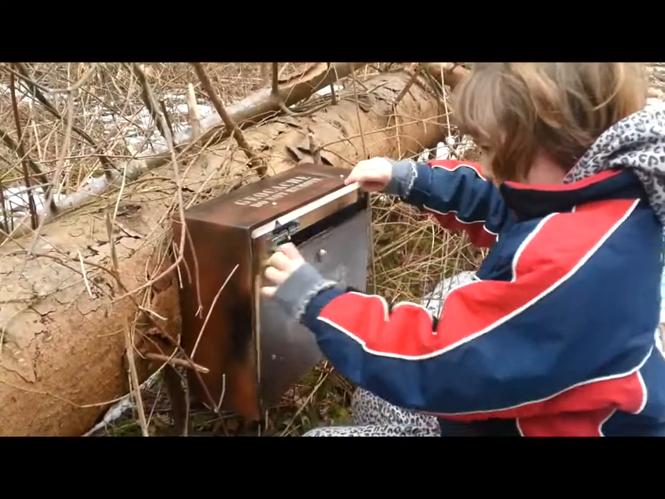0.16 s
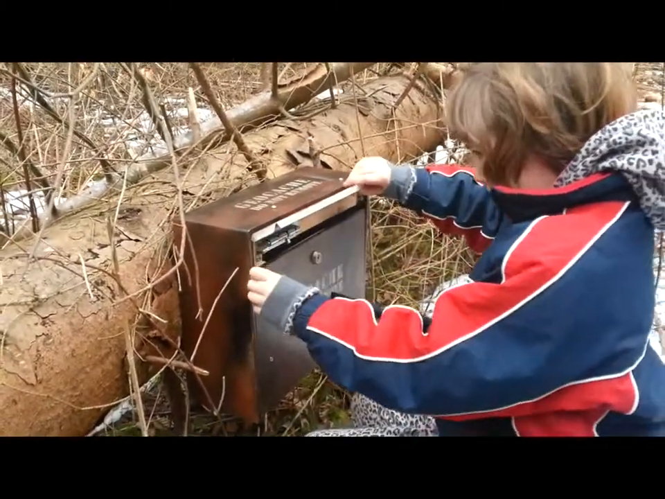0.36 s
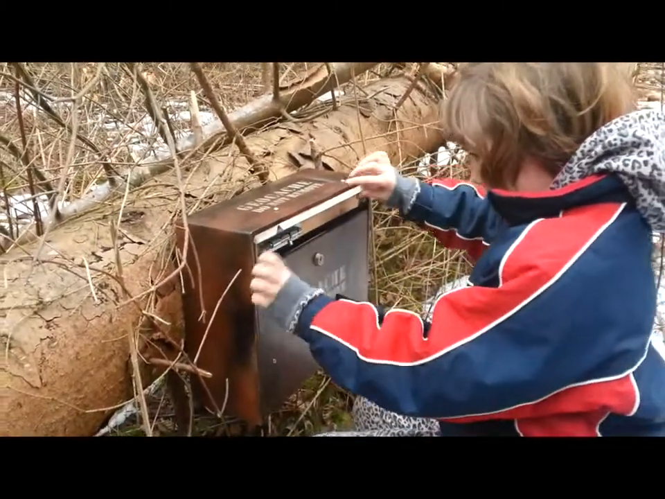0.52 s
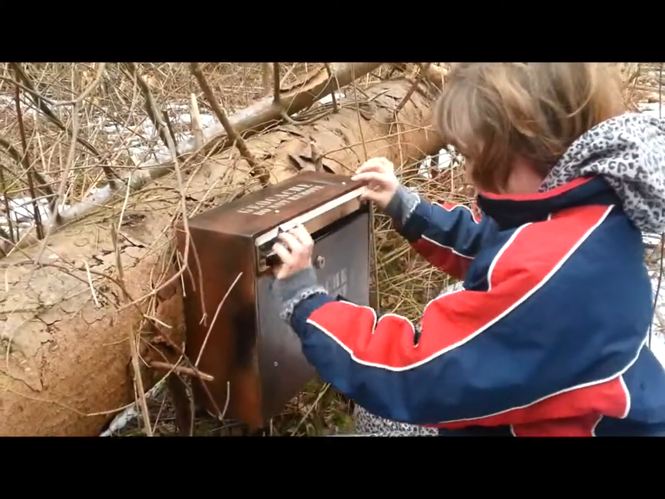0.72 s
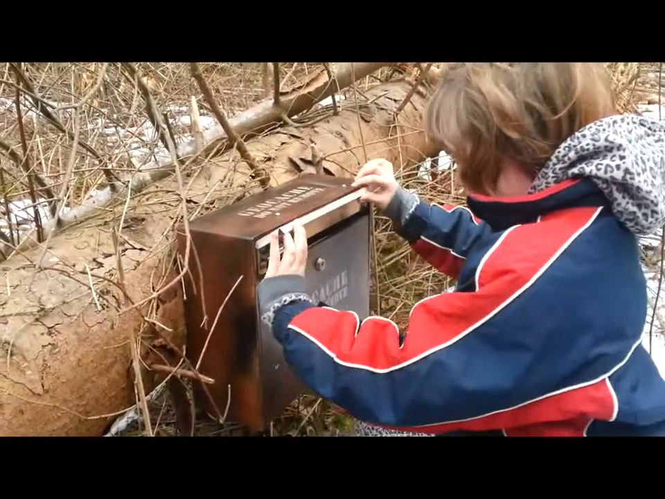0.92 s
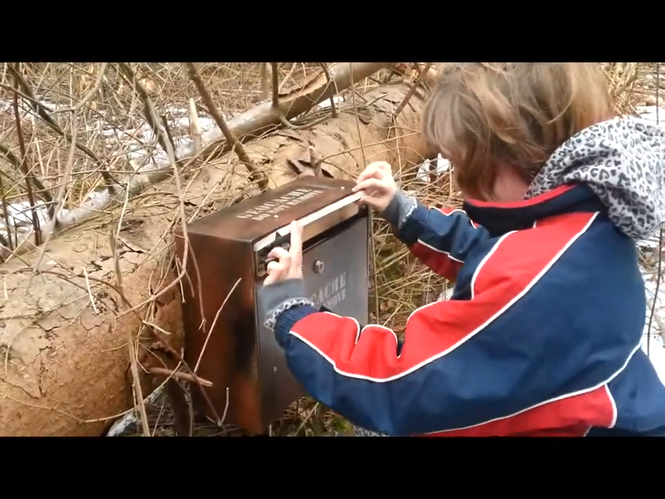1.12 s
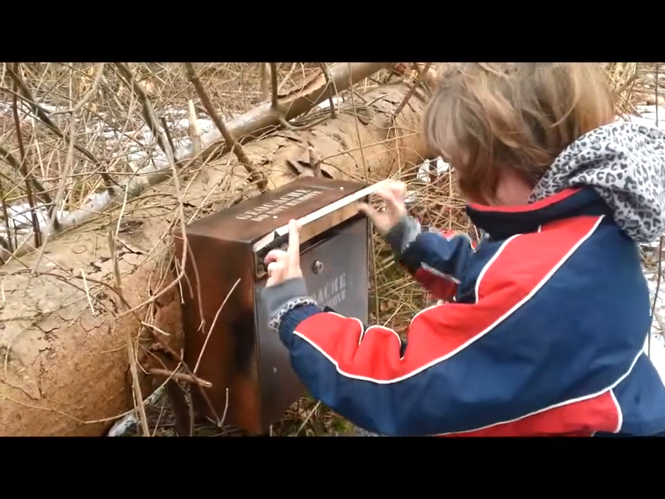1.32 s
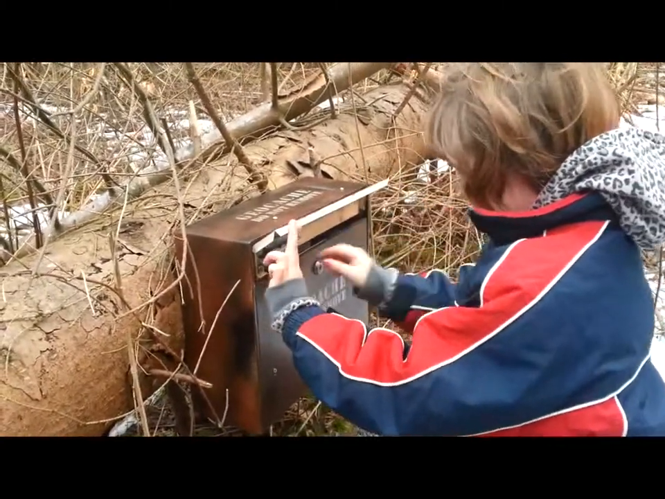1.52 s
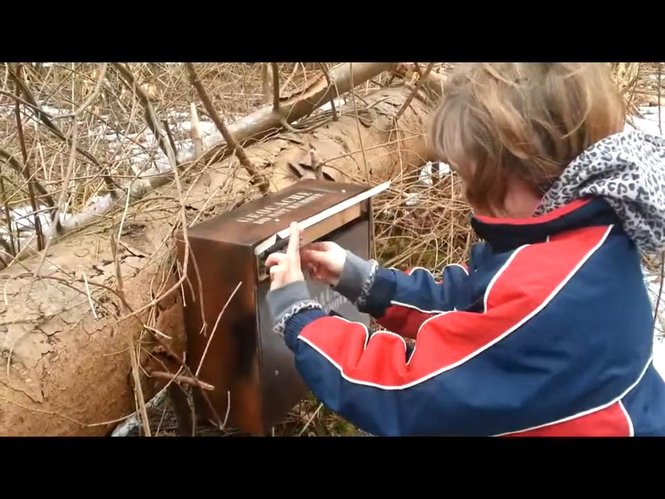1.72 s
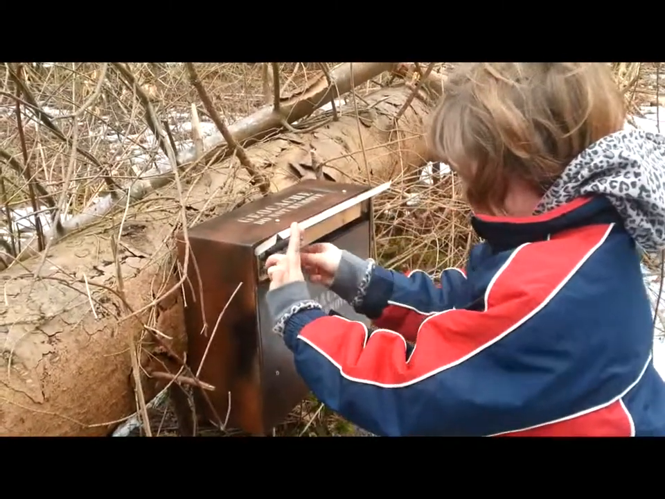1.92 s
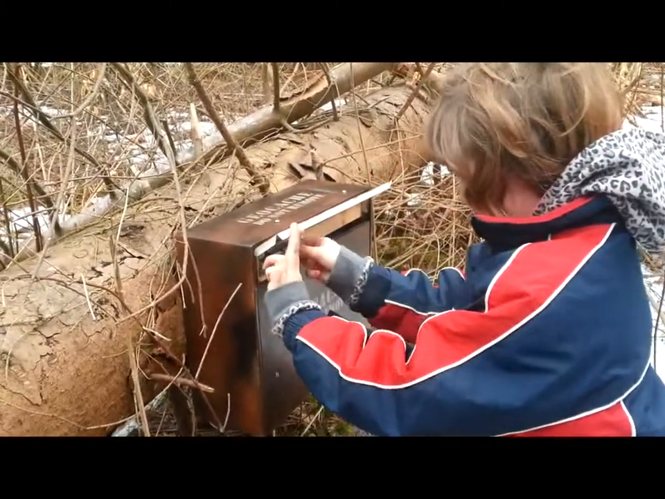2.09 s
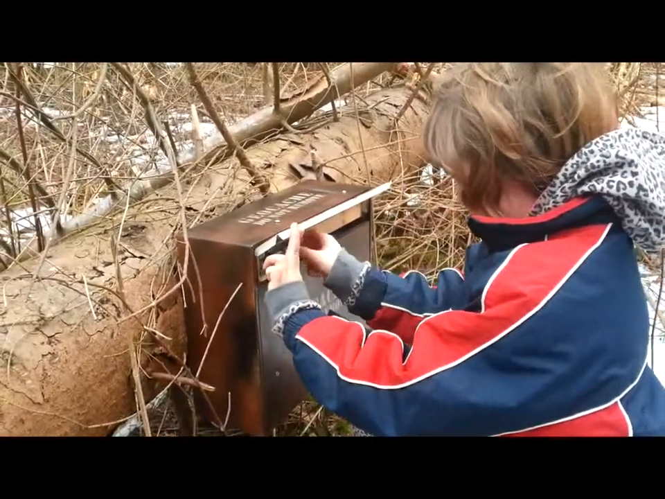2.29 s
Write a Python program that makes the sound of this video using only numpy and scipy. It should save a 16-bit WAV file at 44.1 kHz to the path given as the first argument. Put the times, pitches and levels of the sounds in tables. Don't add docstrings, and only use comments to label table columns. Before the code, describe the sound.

A metal letterbox door scrapes from about 0.1 seconds and slams near 0.27, bouncing quickly with a boxy, hollow ring that fades within half a second. Soft fingertip knocks and brushing follow at 0.7 to 1.1, then near quiet with faint touches around 1.5 to 1.6. At 2.0 the lock snaps brightly and rattles until 2.2. Close outdoor pickup, right-leaning, with low distant traffic, hum and hiss.

```python
import sys
import numpy as np
from scipy import signal
from scipy.fft import rfft, irfft, next_fast_len
from scipy.io import wavfile

SR = 44100
rng = np.random.default_rng(int(sys.argv[2]) if len(sys.argv) > 2 else 0)


def store_pcm(level_fs):
    pcm = np.round(np.clip(level_fs, -1, 1) * 32767).astype(np.int16)
    wavfile.write(sys.argv[1], SR, np.atleast_2d(pcm).T)


def nominal_scale(level):
    x = np.asarray(level, float) / 20
    return 10 ** x


N = 103635


def rms_one(x):
    return x / np.sqrt(np.mean(x ** 2) + 1e-20)


def at_hz(points, hz):
    curve_hz, value = np.transpose(points)
    return np.interp(np.log(hz), np.log(curve_hz), value)


def band(x, low_hz, high_hz, order=2):
    return signal.sosfilt(signal.butter(order, [low_hz, high_hz], "band", fs=SR, output="sos"), x)


def high_pass(x, hz, order):
    return signal.sosfilt(signal.butter(order, hz, "high", fs=SR, output="sos"), x)


def cut_top(x, hz):
    return signal.sosfilt(signal.ellip(12, .5, 70, hz, fs=SR, output="sos"), x)


def drift(rate_hz):
    r = np.exp(-80 * np.pi * rate_hz / SR)
    slow = signal.lfilter([1], [1, -2 * r, r * r], rng.standard_normal(N // 40 + 2002))[2000:]
    return np.interp(np.arange(N) / 40, np.arange(len(slow)), rms_one(slow))


def ring(clicks, hz, t60_s):
    r = nominal_scale(-60 / (max(t60_s, .005) * SR))
    w = 2 * np.pi * hz / SR
    return signal.lfilter([0, np.sin(w)], [1, -2 * r * np.cos(w), r * r], clicks + 1e-18)


def chatter(per_s):
    spread_db = 3.2
    sizes = nominal_scale(spread_db * np.minimum(rng.exponential(1, N), 4)) * rng.choice([-1, 1], N)
    return rms_one(sizes * (rng.random(N) < per_s / SR))


def touches(rows, clicks):
    strike, release_s, touch_db = 15.4, 0.0035, -21
    t = np.arange(N) / SR
    out = np.zeros((3, N))
    for start_s, level_db, boom_db, top_db, length_s in rows:
        fade = np.exp(-np.maximum(t - start_s - length_s, 0) / release_s)
        shape = clicks * (t >= start_s) * fade
        shape[int(start_s * SR)] = strike
        out += shape * nominal_scale(level_db + touch_db + np.array([[boom_db], [0], [top_db]]))
    return out


def door_force(clicks):
    # start_s, force_db, brightness_db
    scrape = [
        (0.099, -52.5, 6),
        (0.159, -38, -6),
        (0.194, -29.5, -8.5),
        (.25, -29.5, -3.5),
        (0.258, -26, 3.5),
        (0.274, -21.5, 2),
        (0.284, -24, 1),
        (0.293, -40, -9),
    ]
    # start_s, level_db, boom_db, top_end_db, chatter_length_s
    bounces = [(0.1876, -38, 6.5, 8.5, 0.012), (0.2554, -19, -4, -6, 0.0037),
               (0.2645, -21.5, 11, -7, 0.0015), (0.2690, -17.5, -8, 7, 0.012),
               (.2815, -13.5, 0, -11, 0.0044), (0.2887, -17, -1.5, -15, 0.014),
               (.2990, -27, -2, 6.5, 0.0046), (0.3058, -23, 0, -4, 0.0099), (0.3145, -27.5, 4.5, 0, 0.012),
               (0.3295, -32.5, 1.5, 1, 0.005), (.3375, -35.5, 10, 2, 0.0088), (0.35, -34.5, 6, -2, 0.013),
               (0.3677, -43, 11, -1, 0.01), (.393, -46.5, 4.5, 0, 0.0094), (0.4084, -44, 5, 2, 0.016)]
    slam_db = -14.5
    t = np.arange(N) / SR
    s, force_db, bright_db = np.transpose(scrape)
    low_db = np.interp(t, s, force_db, left=-99, right=-99) + slam_db
    rub = nominal_scale(low_db + np.interp(t, s, bright_db) * [[0], [1], [1]]) * clicks
    return rub + touches(bounces, clicks)


def finger_force(clicks):
    # start_s, level_db, boom_db, top_end_db, chatter_length_s
    knocks = [(0.6958, -37.5, -8, 0, 0.015), (0.7165, -33, 4.5, 0, 0.0031), (.7225, -34, 5.5, 0, 0.0043),
              (0.7379, -35, 6, 0, 0.014), (0.758, -38, -4, 0, 0.01), (.7765, -35.5, 4.5, 0.34, 0.0036),
              (.817, -39.5, -3, 0.24, 0.0064), (0.8338, -34, 3, 2.4, 0.0046),
              (0.8425, -30.5, -2, 1.1, 0.017), (.8595, -42, 6, 0.36, 0.009), (0.8715, -36, 1, 0.17, 0.0063),
              (.8795, -43, 3.5, 0, 0.0052), (0.9154, -38.5, -23, 0, 0.0034), (0.9827, -43, -11, 0, 0.004),
              (1.0498, -42, -21, 0.24, 0.012), (1.063, -34, -3, 3, 0.01), (1.0844, -48.5, 2, 0.28, 0.015),
              (1.503, -51, 5, 0, 0.028), (1.6003, -42.5, 0.5, 0.17, 0.028), (1.629, -45, -13, 0, 0.022)]
    # time_s, level_db
    fumble = [
        (0, -58),
        (.55, -62.5),
        (.95, -52.5),
        (1.15, -65),
        (1.4, -95),
        (1.6, -54),
        (1.75, -67),
        (2.2, -53),
        (2.35, -76),
    ]
    fumble_db, boom_db = -21, 8
    level_db = np.interp(np.arange(N) / SR, *np.transpose(fumble)) + fumble_db + 3 * drift(24.0)
    brushing = nominal_scale(np.array([level_db + boom_db, level_db, level_db])) * chatter(260)
    return touches(knocks, clicks) + brushing


def lock_force(clicks):
    # start_s, level_db, boom_db, top_end_db, chatter_length_s
    snaps = [(1.980, -33, -18, -6, 0.0056), (1.9898, -17, -12.5, 2, 0.0024),
             (1.9973, -18.5, -11, 2, 0.0043), (2.0035, -23, -1, 12, 0.0062),
             (2.0152, -16.5, -14.5, 2.5, 0.0029), (2.0235, -25.5, -9.5, 0, 0.005),
             (2.0362, -25.5, -10, 4, 0.016), (2.0493, -29, 3, -2, 0.004), (2.0666, -19, -9, -1.5, 0.0052),
             (2.0712, -31, -7, 0, 0.0021), (2.0810, -25.5, -9.5, 0, 0.006), (2.0926, -22, -10, -1, 0.0046),
             (2.1003, -29.5, -2, 5, 0.0068), (2.1065, -27, -7.5, -3, 0.0087),
             (2.1174, -28.5, -3, -6, 0.015), (2.136, -32, -4, -9, 0.0031),
             (2.149, -32.5, -6.5, -12, 0.0065), (2.164, -37.5, -5.5, -2, 0.0092),
             (2.1852, -41, 1, -12, 0.0041), (2.2094, -43.5, 2, -11, 0.013), (2.2514, -46, -2, -3, 0.0071),
             (2.3186, -42, -21, -10, 0.007)]
    return touches(snaps, clicks)


def letterbox(force, part, feel, start_s, end_s):
    # pitch_hz, level_db, t60_s
    panels = [(150, -10.5, 0.74), (207.8, -0.5, 0.43), (228.2, -0.5, 0.41), (294.7, -7.5, 0.51),
              (374.7, 2, 0.35), (436, -4.5, 0.54), (500.6, 2, 0.26), (553, -8, 0.35), (653, -18, 0.069),
              (742, -5.5, 0.063), (814, -8, 0.12), (930, -12.5, 0.14), (976, -12.5, 0.09),
              (1074, -7.5, 0.11)]
    # pitch_hz, level_db
    sheet_level = [(250, 2.5), (600, 0.5), (820, 5.5), (1400, -9), (2500, -10), (4000, -6.5), (6000, -22),
                   (10000, -28)]
    # pitch_hz, t60_s
    sheet_decay = [(120, 0.17), (500, 0.14), (1000, 0.11), (1500, 0.14), (4000, 0.05), (10000, 0.066)]
    panels_db, part_db, sheet_db, crack_db = -3, -9.5, -4, -6
    luck_db = 4.0
    deep_db, top_db, panel_damping, edge_damping, small_db = feel
    i, j = int(start_s * SR), int(end_s * SR)

    modes = [(hz, db + panels_db, t60) for hz, db, t60 in panels]
    modes += [(hz, db + part_db, t60) for hz, db, t60 in part]
    for hz in np.linspace(12, 99, num=80) ** 2 * rng.uniform(.98, 1.02, 80):
        level_db = sheet_db + small_db * (hz < 1250) + at_hz(sheet_level, hz)
        modes.append((hz, level_db, at_hz(sheet_decay, hz)))

    luck = nominal_scale(luck_db * rng.standard_normal((2, 2 * N)) - 2.0)
    luck = luck * rng.choice([-1, 1], (2, 2 * N))
    out = np.zeros((2, N))
    for k, (hz, db, t60_s) in enumerate(modes):
        db = db + deep_db * (hz < 440) + top_db * (hz > 4500)
        row = int(hz > 1250) + int(hz > 4500)
        damping = edge_damping if hz > 1250 else panel_damping
        shift = 900 * k
        struck = force[row, i:j] * luck[:, shift + i:shift + j]
        out[:, i:j] += nominal_scale(db) * ring(struck, hz, t60_s * damping)
    crack = nominal_scale(crack_db + top_db) * band(force[2], 2000, 8800)
    return high_pass(out / 10 + crack, 121, 4)


def ports(shared, loose):
    # pitch_hz, level_db
    port_level = [(60, -6.5), (140, 0), (330, -3.5), (780, -6.5), (1840, -9.5), (4330, -12), (10200, -8)]
    # pitch_hz, phase_rad
    port_phase = [(60, 0), (430, -1.0), (1120, -1.6), (2300, -2.8), (2900, -.4), (3300, 0)]
    # pitch_hz, share
    port_loose = [(100, .05), (500, .12), (1500, .55), (2800, .5), (4500, .1), (10000, .04)]
    size = next_fast_len(N + 4096)
    hz = np.maximum(np.arange(size // 2 + 1) * SR / size, 10)
    half = nominal_scale(at_hz(port_level, hz) / 2)
    apart = np.clip(at_hz(port_loose, hz), 0, 1)
    a, b = rfft(shared, size), rfft(loose, size)
    mixed = np.sqrt(1 - apart) * a + np.sqrt(apart) * b
    left = half * np.exp(1j * at_hz(port_phase, hz)) * mixed
    return np.array([irfft(left, size)[:N], irfft(a / half, size)[:N]])


def puff():
    start_s, level_db, swing_hz = .268, -30, 50
    swings = (np.arange(N) / SR - start_s) * swing_hz
    envelope = (swings > 0) * swings * np.exp(-3 * np.clip(swings, 0, 50))
    return nominal_scale(level_db) * np.sin(2 * np.pi * swings) * envelope


def woods():
    # pitch_hz, level_db_per_hz
    air_level = [(25, -26), (64, -1), (90, -10), (200, -3), (800, -0.5), (2200, -16), (4000, -17.5),
                 (6000, -26.5)]
    # pitch_hz, correlation
    air_likeness = [(60, 0.011), (120, 0.93), (260, -0.14), (540, 0.079), (1130, -0.24), (2350, 0.83),
                    (4900, 1), (10200, 0.97)]
    # pitch_hz, balance_db
    air_balance = [(60, 3.5), (170, 10), (470, -4.5), (1310, -6.5), (3650, -2.5), (10200, -2)]
    air_db, hum_db, hum_hz, hum_width_hz = -52.5, -80.5, 61.7, 5
    edges = 22 * 2 ** np.arange(0, 9.1, .5)
    together = drift(1.5)
    white = rng.standard_normal((2, 2, N + SR))
    air = 0
    for k, (low, high) in enumerate(zip(edges, edges[1:])):
        mid, side = band(white[k % 2], low, high)[:, SR:]
        hz = np.sqrt(low * high)
        alike = np.clip(at_hz(air_likeness, hz), -.99, .99)
        pan_db = at_hz(air_balance, hz) / 2
        level_db = at_hz(air_level, hz) + .4 * together + .9 * drift(10.0)
        gain = nominal_scale(level_db + np.array([[pan_db], [-pan_db]]))
        air = air + gain * (np.sqrt(1 + alike) * mid + np.sqrt(1 - alike) * side * [[1], [-1]])
    hum = ring(white[0, 0], hum_hz, np.log(1000) / np.pi / hum_width_hz)[SR:]
    return nominal_scale(air_db) * air / np.std(air.mean(axis=0)) + nominal_scale(hum_db) * rms_one(hum)


def hiss():
    return nominal_scale(-58.5) * rms_one(high_pass(rng.standard_normal(N), 7600, 3))


def scene():
    # pitch_hz, level_db, t60_s
    door_edge = [(1410, -1, 0.13), (1676, 0, 0.25), (2320, -4, 0.14), (2560, 4, 0.034), (3210, -10, 0.079),
                 (3510, -1, 0.045), (3956, -0.5, .07), (4160, -3, 0.07), (4730, -9.5, 0.08),
                 (5120, -4, 0.059), (5300, -13, 0.1), (5990, -5.5, 0.05), (7220, -9, 0.049),
                 (9050, -6, 0.029)]
    # pitch_hz, level_db, t60_s
    lock_plate = [(520, -5.5, 0.13), (787, 13, 0.15), (981, 5.5, 0.38), (1124, 7.5, 0.13), (1487, 4, 0.27),
                  (1830, 14, 0.028), (2410, 7, 0.058), (3290, 4.5, 0.06), (3580, -3, 0.081),
                  (3935, 1, 0.082), (4590, -3, 0.15), (5080, -8.5, 0.055), (5330, -1.5, 0.063),
                  (7150, -12.5, 0.079)]
    # lowest_panels_db, top_end_db, ringing time left by the hand (panels_share, edge_share), small_modes_db
    door_feel = (-1.5, -3.5, 0.83, 0.79, -4)
    knock_feel = (-3, -3.7, 0.35, 0.58, -1.4)
    click_feel = (-8, -3, 0.76, 0.76, -2)
    clicks = chatter(3000)
    box = letterbox(door_force(clicks), door_edge, door_feel, 0, 1)
    box += letterbox(finger_force(clicks), lock_plate, knock_feel, 0, 2.35)
    box += letterbox(lock_force(clicks), lock_plate, click_feel, 1.9, 2.35)
    return ports(*box) + puff() + cut_top(woods() + hiss(), 9990)


def treble_dropouts(x):
    # start_s, length_s, low_hz, high_hz, share_lost
    dropouts = [
        (.288, .018, 5650, 10400, .97),
        (1.964, .022, 3400, 7000, .75),
        (.298, .03, 2650, 2950, .8),
        (.31, .04, 4350, 4650, .7),
        (.31, .035, 5550, 5900, .8),
    ]
    t = np.arange(N) / SR
    for start_s, length_s, low_hz, high_hz, lost in dropouts:
        gate = np.clip(np.minimum(t - start_s, start_s + length_s - t) / .003, 0, 1)
        sos = signal.butter(4, [low_hz, high_hz], "band", fs=SR, output="sos")
        x = x - lost * gate * signal.sosfiltfilt(sos, x)
    return x


def roll_off(x):
    return signal.sosfilt(signal.butter(12, 10800, fs=SR, output="sos"), x)


def record(dry):
    mix = treble_dropouts(cut_top(dry, 10120))
    return roll_off(mix)


dry = scene()
out = record(dry)
store_pcm(out)
```